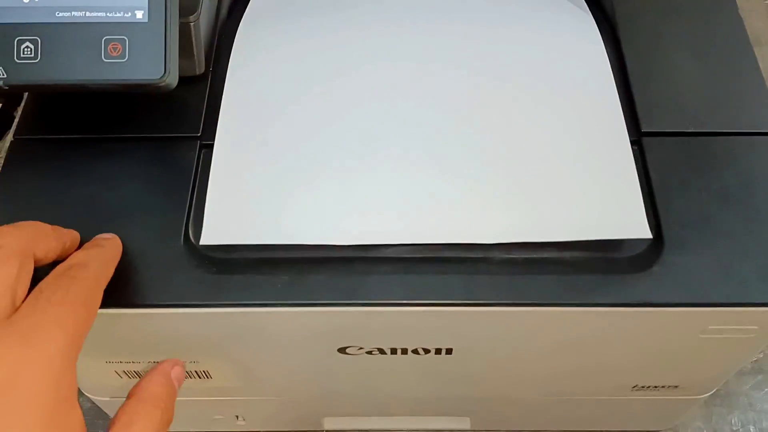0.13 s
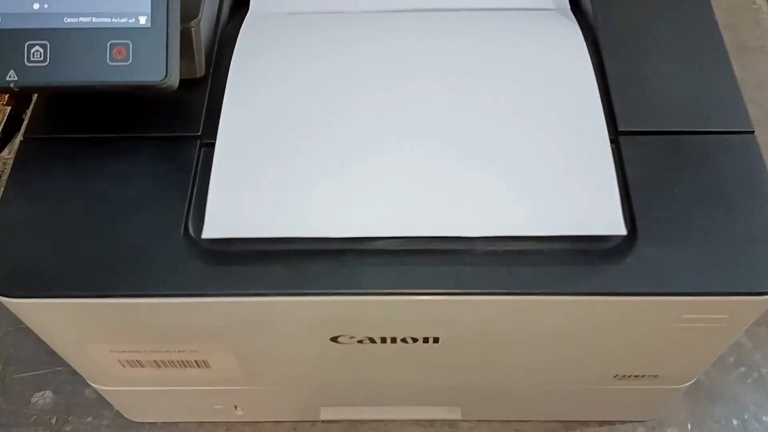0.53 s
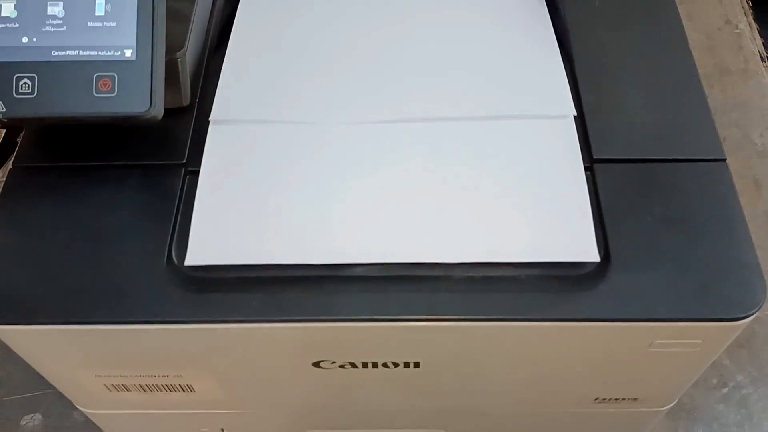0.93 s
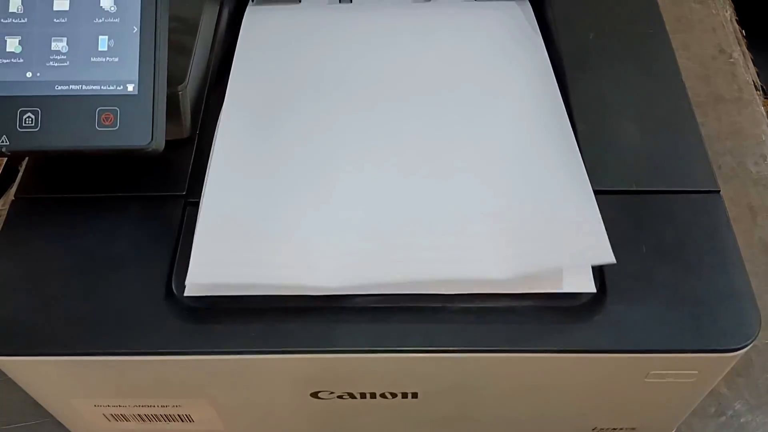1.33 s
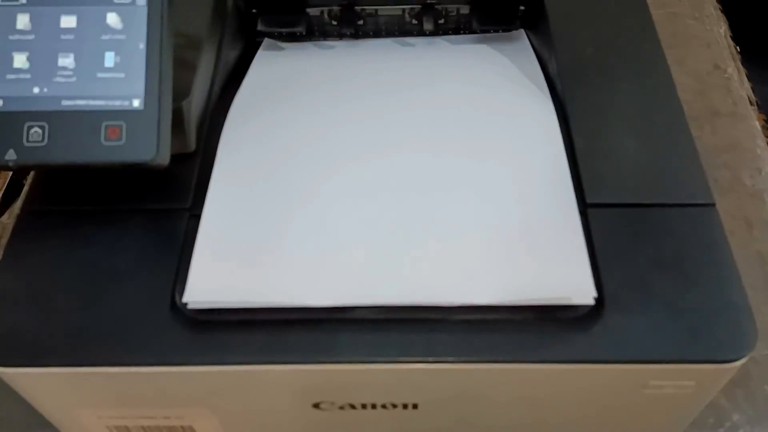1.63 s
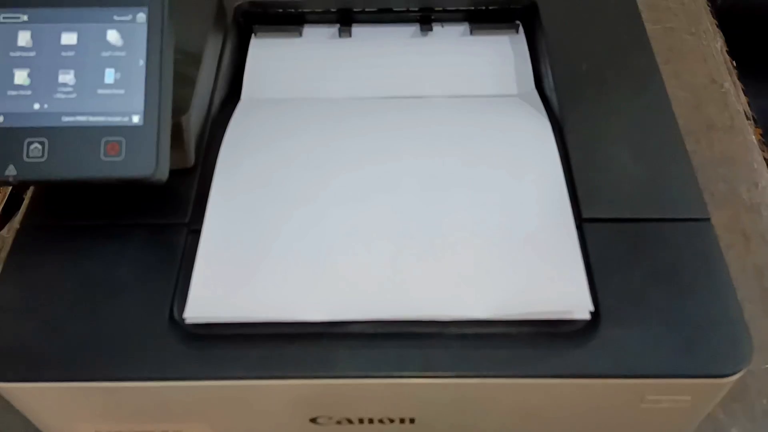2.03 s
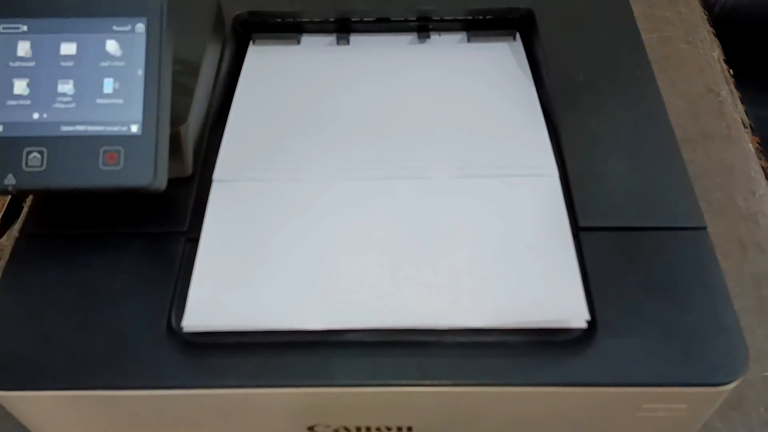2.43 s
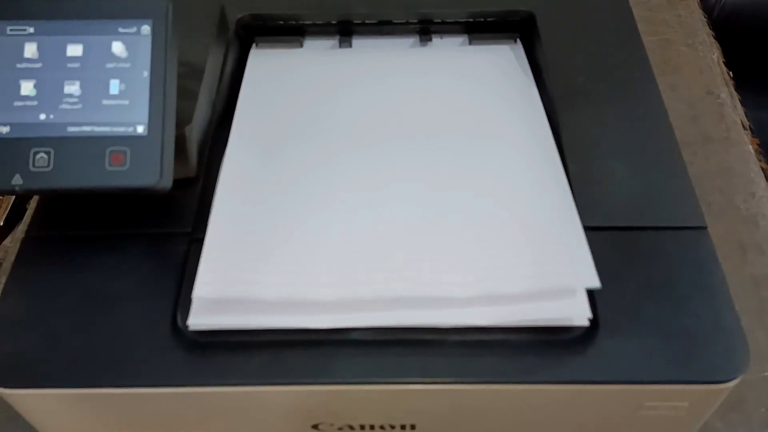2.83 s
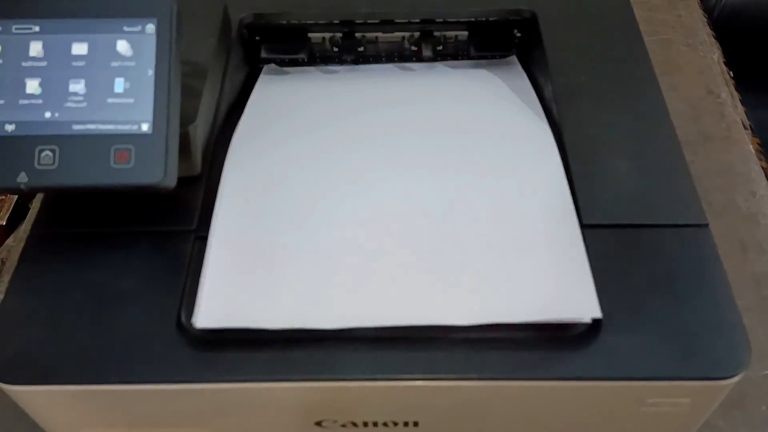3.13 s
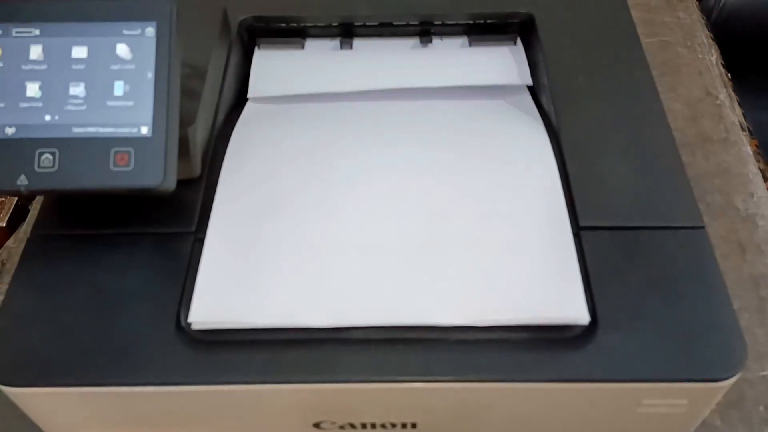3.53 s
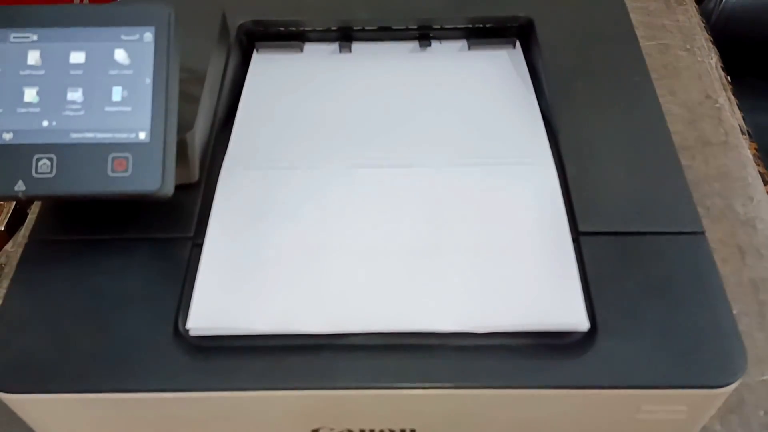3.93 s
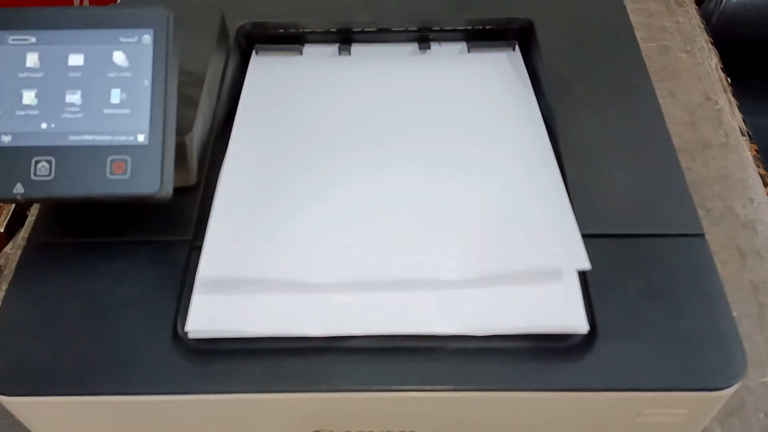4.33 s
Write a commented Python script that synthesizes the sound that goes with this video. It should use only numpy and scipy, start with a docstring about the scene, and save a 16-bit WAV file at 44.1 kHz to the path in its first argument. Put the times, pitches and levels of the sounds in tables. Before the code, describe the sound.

Paper sheets feed rapidly out of a humming office printer, with plastic clicks, rattles and papery swishes repeating in a regular mechanical cycle.

```python
"""Close above the tray of a laser printer, sheets are fed at a steady pace.
The drive motor hums one steady note, with two thin whines: these are sine waves that waver a little.
Gear rumble, fan hiss and the rustle of sliding paper are shaped noise; some gears add fuzzy notes.
Clutch clicks and paper snaps are short noise bursts that ring the plastic casing.
Now and then a sheet scuffs over a guide: grainy noise through narrow, sinking resonances."""
import sys
import numpy as np
from scipy import signal
from scipy.fft import rfft, irfft
from scipy.io import wavfile
from scipy.ndimage import uniform_filter1d

SR = 44100
rng = np.random.default_rng(int(sys.argv[2]) if len(sys.argv) > 2 else 0)


def magnitude_from_level(level_db):
    """Linear magnitude for a level in decibels (20 dB per decade)."""
    exponent = np.asarray(level_db, float) / 20
    return 10 ** exponent


def to_wav(sig):
    """Store sig (one row per channel, or 1-D mono) as 16-bit WAV at the path in sys.argv[1].

    Samples outside -1..1 are clipped; the rate is SR.
    """
    pcm = np.clip(np.atleast_2d(sig), -1, 1) * 32767
    pcm = np.round(pcm).astype(np.int16)
    wavfile.write(sys.argv[1], SR, pcm.T)  # frames by channels


N = 197347
LAG_S = 4 / SR  # the left port is a little further away

# the drive labours unevenly: (time [s], motor note level [dB], gear growl level, mean taken off later [dB])
DRIVE_EFFORT = [(0, -20, -27), (.11, -27.5, -51), (.19, -19, -30.5), (.38, -25, -33), (.44, -22.5, -41),
                (.68, -27, -41), (.74, -23, -36.5), (.83, -26.5, -49.5), (.94, -22, -49.5),
                (1.13, -26, -41), (1.22, -19.5, -32), (1.29, -27.5, -44.5), (1.51, -23.5, -48.5),
                (1.59, -20, -28.5), (1.69, -27.5, -51), (1.85, -22, -29), (1.91, -25.5, -37.5),
                (2.19, -21.5, -36.5), (2.48, -22, -46), (2.61, -26, -47), (2.68, -22, -34),
                (2.74, -26, -39.5), (2.8, -18.5, -27), (3.05, -26.5, -44.5), (3.15, -22.5, -34),
                (3.24, -24, -51.5), (3.37, -28.5, -49.5), (3.6, -21.5, -33.5), (3.79, -21.5, -32.5),
                (3.87, -24, -43.5), (4.47, -25.5, -43.5)]
# what the plastic casing rings with: (pitch [Hz], width before scaling [Hz], relative level [dB])
CASING_RINGS = [(330, 20, 14.5), (560, 23, -1.5), (806.5, 39, 13.5), (998, 150, -7), (1250, 118, 9),
                (1366, 100, -0.5), (1800, 81, 5.5), (2124, 150, 6.5), (2613, 52, 8), (3200, 68, 11.5),
                (3700, 140, 13)]


def evened(x):
    """Scales a sound to an rms of 1."""
    return x / np.sqrt(np.mean(x ** 2) + 1e-20)


def read(points, hz):
    """Reads a table of (frequency, value) along a logarithmic frequency axis."""
    f, value = np.transpose(points)
    return np.interp(np.log(hz + 1), np.log(f + 1), value)


def curve(rows, t, order=1):
    """Reads column number `order` of a table at time t, with straight lines between its rows."""
    rows = np.array(rows)
    return np.interp(t, rows[:, 0], rows[:, order])


def band(x, lo_hz, hi_hz, order=4):
    """Keeps only the frequencies between two limits."""
    limits = [lo_hz, min(hi_hz, .45 * SR)]
    return signal.sosfilt(signal.butter(order, limits, "bandpass", fs=SR, output="sos"), x)


def resonate(x, hz, width):
    """A fixed resonance of gain 1 at its centre; the narrower it is, the longer it rings."""
    r = np.exp(-np.pi * width / SR)
    return 2 * signal.lfilter([1 - r], [1, -r * np.exp(2j * np.pi * hz / SR)], x).real


def wander(rate_hz):
    """Slow chance of rms 1: random knots, 100 a second, smoothed by a low-pass filter."""
    knots = rng.standard_normal(int(N / SR * 100) + 2)
    slow = signal.filtfilt(*signal.butter(2, np.clip(rate_hz / 50, .01, .9)), knots)
    return evened(np.interp(np.arange(N) / SR * 100, np.arange(len(knots)), slow))


def noise(field_db, size, patchy_db, flicker_db):
    """Two-channel noise from random short-time spectra; field_db(hz, t) gives colour and level."""
    # how alike left and right are: (frequency [Hz], likeness [0 to 1])
    likeness = [(25, .4), (80, 0.96), (200, 0.97), (500, 0.91), (1100, 0.057), (7800, 0.18)]
    hop = size // 4
    frames, hz = N // hop + 5, np.fft.rfftfreq(size, 1 / SR)
    t = np.arange(frames) * hop / SR
    a, b, c, d, patches = rng.standard_normal((frames, len(hz), 5)).T
    # the flicker is shared over wide bands; the patches are short narrow streaks
    flicker = evened(uniform_filter1d(patches, size=len(hz) // 2, axis=0))
    patches = uniform_filter1d(patches, size=3, axis=0)
    patches = evened(uniform_filter1d(patches, size=14, axis=1))
    same = np.clip(read(likeness, hz), -1, 1)[:, None]
    left = a + 1j * b
    right = same * left + np.sqrt(1 - same ** 2) * (c + 1j * d)
    level_db = field_db(hz[:, None], t) + patchy_db * 2 * np.tanh(patches / 2) + flicker_db * flicker
    spectra = np.array([left, right]) * magnitude_from_level(level_db)
    return signal.istft(spectra, nperseg=size, noverlap=size - hop)[1][:, :N]


def motor():
    """The drive makes a clean note with slight phase wobble, and two whines that come and go."""
    # levels of the whines: (time [s], lower whine [dB], upper whine [dB])
    whine_levels = [(0, -41, -57), (.3, -82, -59), (.55, -59, -54), (.9, -63, -59.5), (1.35, -47.5, -53),
                    (1.55, -85, -52.5), (2.05, -66.5, -56), (2.28, -49.5, -65), (2.52, -59.5, -64),
                    (2.8, -47, -52), (3.1, -76, -69.5), (3.6, -65, -53.5), (3.95, -53, -80),
                    (4.47, -48, -61)]
    # two thin whines an octave apart: (lower [Hz], upper [Hz])
    whine_pitches = (2624.9, 5249.2)
    hum_hz = 262.35
    waver_db, waver_hz = 1.5, 5.4  # the note also wavers by chance
    t = np.arange(N) / SR
    note_db = curve(DRIVE_EFFORT, t) + waver_db * wander(waver_hz)
    note_phase = 2 * np.pi * hum_hz * t + 0.23 * wander(rate_hz=18)
    # sqrt(2) gives a sine wave an rms of 1
    out = np.sqrt(2) * magnitude_from_level(note_db) * np.cos(note_phase) * np.ones((2, 1))
    ahead = t + np.array([[LAG_S], [0]])  # the whines come from the left side and reach both ports together
    for k, hz in enumerate(whine_pitches):
        level_db = curve(whine_levels, t, order=k + 1) + 3.2 * wander(rate_hz=25)
        phase = 2 * np.pi * hz * ahead + .9 * wander(rate_hz=30)
        out += np.sqrt(2) * magnitude_from_level(level_db) * np.cos(phase)
    return out


def rumble():
    """Gear noise booms in the cabinet; the growl above the motor note comes and goes most."""
    # colour of the boom: (frequency [Hz], relative level [dB])
    cabinet = [(20, -54.5), (60, -37), (100, -22), (130, -25.5), (200, -3.5), (260, -0.5), (300, -3),
               (380, -19.5), (450, -29), (570, -58), (800, -101.5)]

    def boom_db(hz, t):
        growl_db = curve(DRIVE_EFFORT, t, order=2)
        growl_share = np.interp(hz, [180, 320], [.15, 1])
        return read(cabinet, hz) + (growl_db - growl_db.mean()) * growl_share

    return magnitude_from_level(-32.0) * evened(noise(boom_db, size=2048, patchy_db=3.5, flicker_db=1.5))


def fan():
    """Even fan and roller hiss, with fuzzy gear notes of narrow noise that swell once for each sheet."""
    # colour of the hiss as recorded, with the recorder's gap near 9 kHz:
    # (frequency [Hz], relative level [dB per Hz])
    hiss_colour = [(400, -33.5), (600, -25), (900, 3.5), (1100, -16.5), (1700, -14.5), (2300, -13.5),
                   (3800, -9), (4150, -10.5), (4900, -14), (5300, -7.5), (6600, -4), (7600, -5.5),
                   (8400, -28.5), (9000, -101.5), (10000, -40), (16000, -31.5)]
    # fuzzy notes of gears and rollers: (pitch [Hz], width [Hz], mean level [dB], swing [dB], loudest at [s])
    gear_notes = [(524, 4, -63.5, 10, 0.48), (641, 15, -65, 11, 0.39), (883, 10, -54, 4.5, 1)]
    hiss_db, sheet_s = -47.5, 1.563  # one sheet follows another after sheet_s seconds

    def hiss_field_db(hz, t):
        return read(hiss_colour, hz) + 0 * t

    out = magnitude_from_level(hiss_db) * evened(noise(hiss_field_db, size=1024, patchy_db=9.0, flicker_db=1.0))
    t = np.arange(N) / SR
    for hz, width, db, swing_db, loudest in gear_notes:
        swell_db = swing_db * np.cos(2 * np.pi * (t - loudest) / sheet_s)
        level_db = db + swell_db + 3.95 * wander(rate_hz=4.8)
        out += magnitude_from_level(level_db) * evened(resonate(rng.standard_normal(N), hz, width))
    return out


def in_round(rows, t, order=1):
    """Reads a table of the sheet's round at time t; also tells which sheet is running."""
    # each sheet starts its round:
    # (time [s], added rustle level [dB], added brightness [dB per octave], body in the lows [dB])
    sheets = np.array([(-.518, 4, 1, -4), (1.049, 0, 1.9, -4), (2.619, -0.2, 2.5, -3.5),
                       (4.177, -3.5, 0, -1.5)])
    sheet = sheets[np.searchsorted(sheets[:, 0], t, "right") - 1].T
    return curve(rows, t - sheet[0], order=order), sheet


def slide(t, order):
    """Level (order 1) or brightness (order 2) of the rustle: the common round plus the sheet's own."""
    # paper sliding through the rollers, the same in every round:
    # (time after the start [s], level [dB], brightness [dB per octave])
    common_round = [(0, -29.5, 7.5), (.012, -24, -3), (.14, -32.5, -4), (.27, -35, -0.5), (.32, -44.5, -7),
                    (.45, -40, -7.5), (.49, -47, 11), (.53, -29.5, 0.5), (.65, -39, -0.5), (.85, -38.5, -3),
                    (1.02, -42.5, -18), (1.2, -46.5, -5.5), (1.5, -42.5, -4.5)]
    common_db, sheet = in_round(common_round, t, order=order)
    return common_db + sheet[order]


def paper():
    """Rustle: patchy noise whose brightness rises and falls through each round, and ticks that ring the casing."""
    # colour of the rustle: (frequency [Hz], relative level [dB per Hz])
    paper_colour = [(240, -23), (400, 4.5), (623, -14), (855, 0.5), (1510, -1), (1970, -1), (2330, -7),
                    (3490, -4), (4170, -14.5), (7370, -19.5), (8260, -39.5), (10700, -63), (18200, -120)]

    def tilt_db(hz, t):
        sheet = in_round([(0, 0)], t)[1]  # only the sheet's own settings are needed here
        body_db = sheet[3] * np.clip(np.log2(1500 / (hz + 1)), 0, 1)  # in full below 750 Hz
        bright_db = slide(t, order=2) * np.clip(np.log2(hz / 1600 + .01), 0, 1.2)  # above 1.6 kHz
        return read(paper_colour, hz) + body_db + bright_db

    rustle = evened(noise(tilt_db, size=768, patchy_db=7.0, flicker_db=1.5))
    ticks, t = 0, np.arange(N) / SR
    for hz, width, db in CASING_RINGS:
        strength = magnitude_from_level(7 * np.minimum(rng.exponential(1, (2, N)), 4))
        taps = strength * (rng.random((2, N)) < 150 / SR)  # about 150 taps a second
        ticks = ticks + magnitude_from_level(db + tilt_db(hz, t)) * resonate(taps, hz, 0.5 * width) / width
    ticks = magnitude_from_level(-7.5) * evened(band(ticks, 280, 5900))
    return evened(rustle + ticks) * magnitude_from_level(slide(t, order=1))


def clicks():
    """Each click is a short chatter that rings the casing near its own pitch, with a crack and a rattle."""
    # clutch clicks and paper snaps:
    # (time [s], ring peak [dB], loudest ring [Hz], treble peak [dB], air peak [dB])
    click_list = [(.003, -14, 1890, -15, -35), (0.073, -48, 3700, -22.5, -49),
                  (0.152, -42, 6030, -19.5, -89), (.241, -17.5, 1250, -20, -35.5),
                  (0.262, -17, 1310, -32, -57), (.332, -24, 2800, -30, -76), (1.029, -22, 940, -34, -48),
                  (1.0491, -5.5, 1250, -19, -41), (1.118, -19, 1250, -54, -96),
                  (1.145, -21.5, 1800, -18.5, -54), (1.207, -15.5, 3700, -21, -41),
                  (1.294, -20, 1800, -31.5, -89), (1.404, -28, 3700, -60, -62),
                  (1.465, -21, 1165, -58, -69), (1.519, -20, 3780, -26, -75),
                  (1.571, -10, 2560, -16.5, -36.5), (1.703, -37.5, 3700, -25, -66),
                  (1.746, -33.5, 5800, -25, -82), (1.794, -23.5, 3760, -21, -39),
                  (2.623, -8, 1450, -22, -49), (2.698, -15.5, 1800, -21, -45),
                  (2.77, -14.5, 3700, -22, -40), (2.826, -21.5, 2900, -46, -85),
                  (2.878, -27, 1800, -34, -56), (3.021, -22.5, 1530, -63, -87),
                  (3.069, -19.5, 3700, -26, -58), (3.097, -27, 3700, -26, -48),
                  (3.116, -18, 1030, -43, -44), (3.13, -13, 2520, -15.5, -33),
                  (3.367, -35.5, 3340, -27, -38), (4.179, -14.5, 1260, -26, -48.5),
                  (4.245, -21, 2900, -45, -73), (4.267, -14.5, 2140, -21.5, -49),
                  (4.337, -25.5, 3200, -28, -86), (4.416, -24.5, 3600, -65, -78)]
    # small hard parts ring in the treble: (pitch, give or take 5 % [Hz], width [Hz])
    latch = [(5800, 780), (7200, 5100)]
    # how much loose parts rattle after a click, by its place in the round:
    # (time after the start [s], level [dB])
    rattle_levels = [(0, -13), (.16, -7.5), (.22, 26), (.38, 0), (.47, -3), (.56, 2), (.7, -20),
                     (.75, 12.5), (.95, -10), (1.5, -8.5)]
    thud_db, thud_t60_s = -10, 0.067  # level over the air peak setting, time to fall by 60 dB
    out, t = np.zeros((2, N + 16000)), np.arange(16000) / SR
    first = magnitude_from_level(-60 * t / 0.032)
    second = magnitude_from_level(-60 * (t - .005) / 0.07) * (t > .005)  # the part lands a second time
    for s, ring_db, hz, treble_db, air_db in click_list:
        a, b = rng.standard_normal((2, len(t)))
        a[0] = b[0] = 12  # the hard first contact
        burst = np.array([a, 0.019 * a + 0.67 * b])
        grit_db = 5.6 * np.repeat(rng.standard_normal(len(t) // 100), repeats=100)  # loose parts knock unevenly
        blow = first + min(magnitude_from_level(ring_db + 11.5), .8) * second  # heavy blows bounce most
        rattle = magnitude_from_level(in_round(rattle_levels, s)[0] + grit_db - 60 * t / 0.22)
        chatter = (burst + 0.055 * a) * (blow + rattle)

        ring = 0
        for f, w, d in CASING_RINGS:
            near = magnitude_from_level(d - 17.0 * abs(np.log2(f / hz)))  # weaker by 17 dB per octave away from the click's pitch
            twice = resonate(resonate(chatter, f, 2.7 * w), f, 2.7 * w)
            ring = ring + near * twice / np.sqrt(w)
        knock_gain = magnitude_from_level(-3) * ring[:, :500].std() / chatter[:, :500].std()
        ring += knock_gain * resonate(chatter, 1.3 * hz, .9 * hz)  # broad knock under the ring

        crack = burst * (blow ** 2 + magnitude_from_level(-3.5 - 60 * t / 0.43) * rattle)  # treble dies sooner
        bright = .25 * crack
        for f, w in latch:
            bright = bright + resonate(crack, f * rng.uniform(.95, 1.05), w)
        parts = [(ring_db, band(ring, 370, 4500)),
                 (treble_db, band(bright, 4300, 7900, order=10)),
                 (air_db, band(crack, 9450, 15800, order=8))]

        place = out[:, round(s * SR):][:, :len(t)]
        # sharp clicks also jolt the body
        place += magnitude_from_level(air_db + thud_db - 60 * t / thud_t60_s) * evened(band(burst, 25, 120))
        for db, part in parts:
            # the peak stands well over the mean of the first 11 ms
            place += magnitude_from_level(db - 11.5) * part / part[:, :500].std()
    return out[:, :N]


def scuffs():
    """Grainy friction swells fast and fades, in three narrow resonances that sink a little."""
    # the sheet scuffs over a guide: (time [s], middle pitch, about [Hz], level before the swell [dB])
    scuff_list = [(.4, 1800, -38.5), (1.791, 1244, -35), (1.97, 1780, -40), (2.548, 1800, -41),
                  (3.385, 1026, -50.5), (3.54, 1460, -42.5)]
    scuff_s = 0.11  # each scuff lasts twice this time
    out = np.zeros((2, N))
    for s, hz, db in scuff_list:
        u = np.arange(round(2 * scuff_s * SR)) / (scuff_s * SR)
        rough_db = 2.7 * np.repeat(rng.standard_normal(len(u) // 150 + 1), repeats=150)[:len(u)]
        grain = rng.standard_normal((2, len(u))) * magnitude_from_level(rough_db)
        grain = grain + 0.24 * grain[::-1]  # each side hears some of the other
        swell = magnitude_from_level(db) * np.sqrt(u) * np.exp(-1.6 * u ** 2)
        for f in hz * np.array([.8, 1, 1.17]) * rng.uniform(1.0, 1.03, size=3):
            # shift the sinking pitch down to zero, smooth there, and shift back up
            turn = np.exp(2j * np.pi * np.cumsum(f * (1 - 0.047 * u)) / SR)
            slow = signal.lfilter([1], [1, -np.exp(-np.pi * 90 / SR)], grain / turn)
            tone = evened(band((slow * turn).real, hz / 2, hz * 2))
            out[:, round(s * SR):][:, :len(u)] += swell * tone
    return out


def scene():
    """All sounds of the printer together."""
    return motor() + rumble() + fan() + paper() + clicks() + scuffs()


def band_limit(x):
    """A steep low-pass at the top of the band."""
    return signal.sosfilt(signal.butter(12, 16100, fs=SR, output="sos"), x)


def record(dry):
    """The two microphone ports hear the printer with different colour and delay."""
    # colour of the ports: (frequency [Hz], left minus right [dB])
    port_lean = [(40, 2.5), (200, -1), (400, -1.5), (780, -8.5), (1540, -1), (3470, 0.5), (6000, -6),
                 (8000, -8), (9000, 8.5), (13000, -5.5)]
    hz = np.fft.rfftfreq(N, 1 / SR)
    lean = magnitude_from_level(read(port_lean, hz) / 2)  # half goes to each side
    left = lean * np.exp(-2j * np.pi * hz * LAG_S)
    right = 1 / lean
    ports = irfft(rfft(dry) * np.array([left, right]), N)
    return band_limit(ports)


dry = scene()
out = record(dry)
to_wav(out)
```